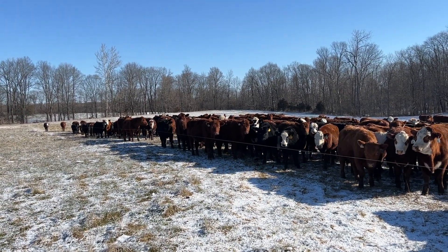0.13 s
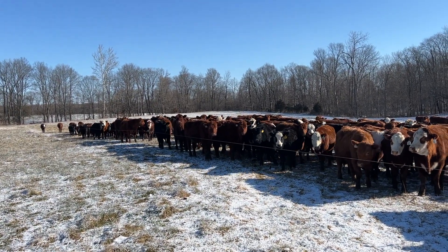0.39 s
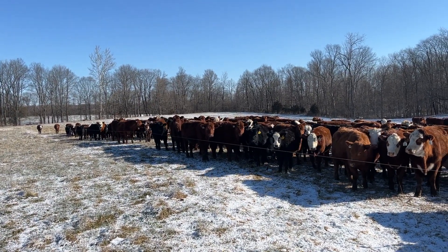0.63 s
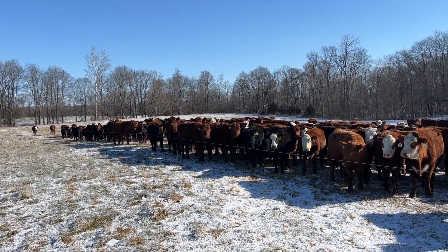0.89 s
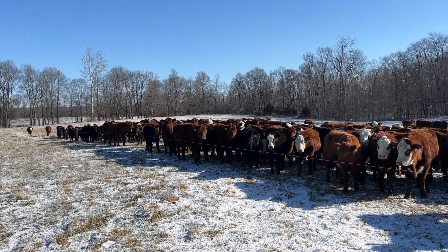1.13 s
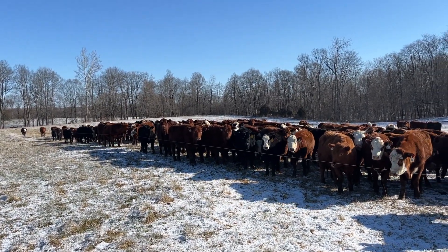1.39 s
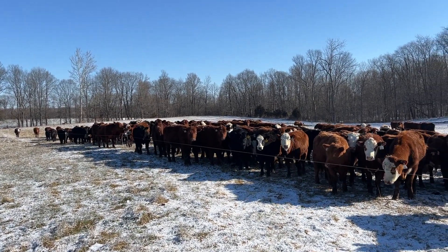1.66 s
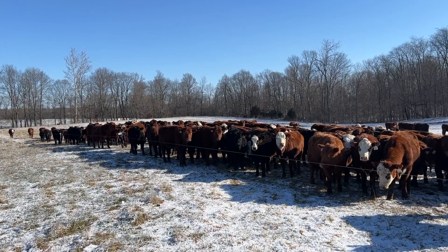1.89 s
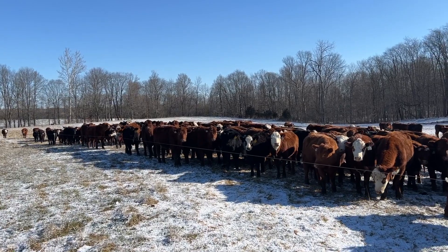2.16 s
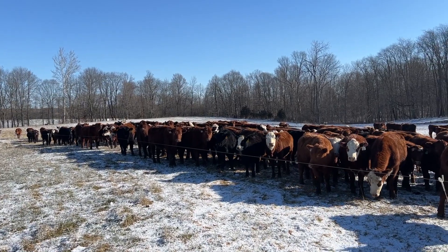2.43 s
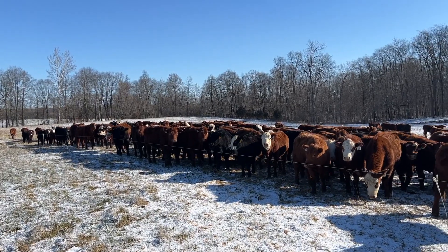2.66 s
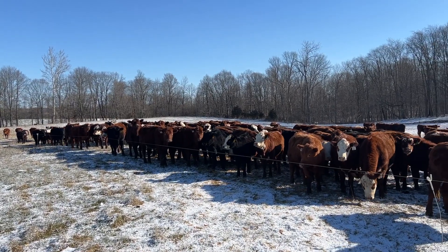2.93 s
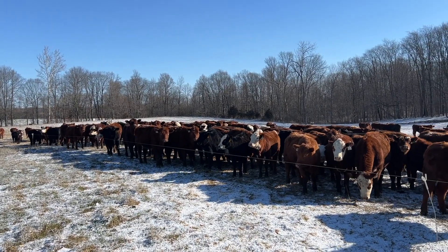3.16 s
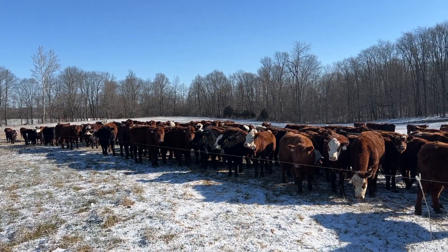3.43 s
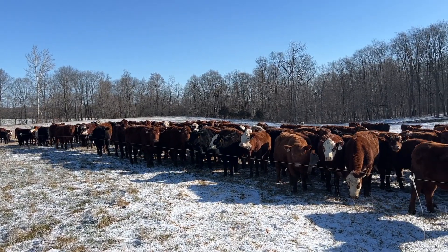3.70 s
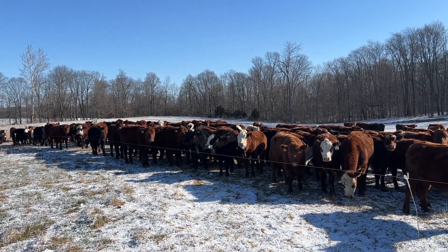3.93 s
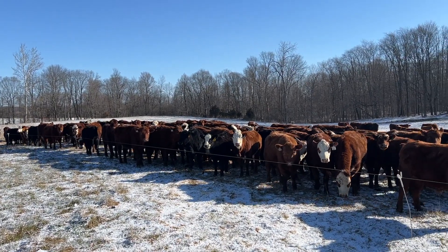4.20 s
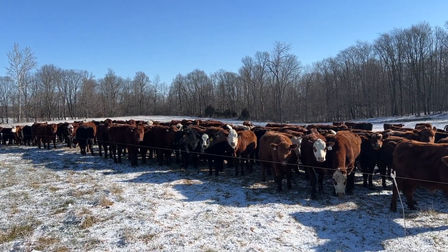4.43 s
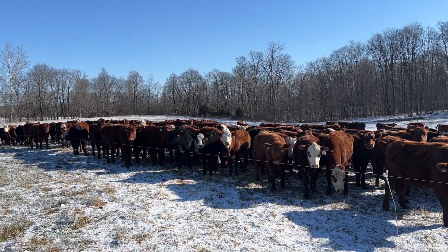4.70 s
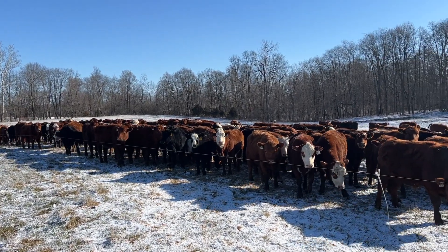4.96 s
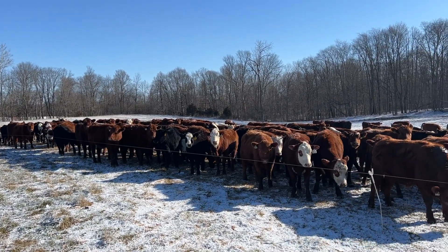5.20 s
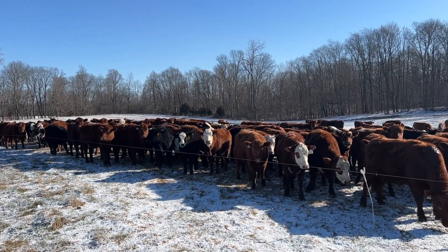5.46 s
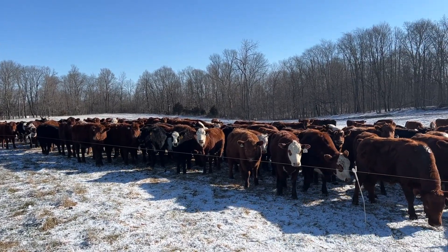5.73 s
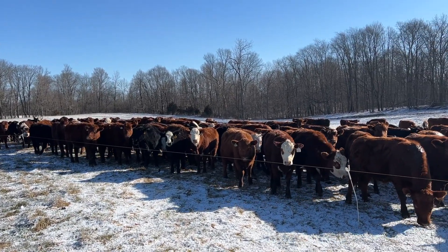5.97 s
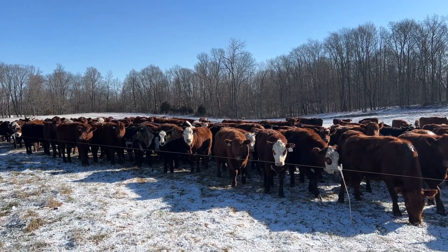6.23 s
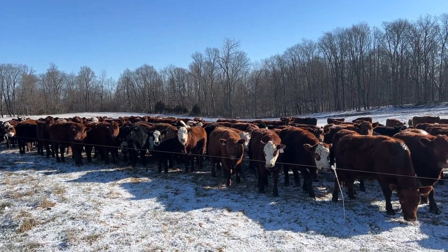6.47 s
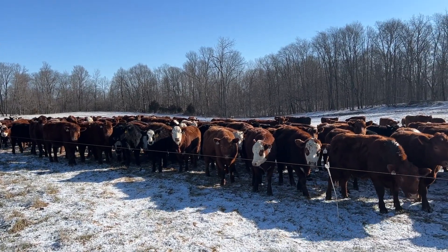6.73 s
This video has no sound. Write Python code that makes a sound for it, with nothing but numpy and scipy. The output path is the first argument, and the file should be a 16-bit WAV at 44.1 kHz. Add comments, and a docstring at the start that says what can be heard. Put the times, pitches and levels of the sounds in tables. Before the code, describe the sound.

Throughout, a small one-cylinder engine idles a little to the right, about ten or eleven soft low thumps a second, with thin metallic ticks and a fluctuating hiss; thump and hiss weaken after about 5.7 s. Low wind rumble comes in gusts at the start, 1.4, 2.1, 2.6, 3.2, 4.5 and 5.5 s, with sharp microphone slaps near 1.6, 2.7-3.05 and 5.7 s. A moo already sounding drops in pitch and stops by 0.3 s. From 0.9 s a cow hums low, opens its mouth around 1.4 s, climbs to a loud sustained moo, then sags and ends at 3.1 s. A shorter moo rises and falls from 3.4 to 4.0 s, followed by a faint breathy grunt until 4.35 s. Two quieter moos overlap between 4.6 and 5.8 s, the first leaning left. Soft wind flutters and the fading engine remain until nearly 7 s. Dry, open air, with barely any return from trees.

```python
"""Cattle in a windy pasture

Five cows moo in long glides, two of them at once, and one grunts faintly: harmonics and breath noise are shaped by
spectral envelopes. A small one-cylinder engine idles, louder on the right: swells, ringing ticks and filtered hiss.
Gusts buffet a phone's microphones: bands of noise that follow the wind level, with sudden slaps and soft flutters."""
import sys
import numpy as np
from scipy import signal
from scipy.fft import rfft, irfft
from scipy.io import wavfile
from scipy.ndimage import uniform_filter1d

SR = 44100
rng = np.random.default_rng(int(sys.argv[2]) if len(sys.argv) > 2 else 0)


def wav_record(signal):
    """Record a signal, one row per channel, as 16-bit PCM in the file named by sys.argv[1]."""
    frames = np.transpose(np.atleast_2d(signal))
    bounded = np.clip(frames, -1, 1)
    # unit amplitude maps onto the largest positive 16-bit level
    quanta = np.round(bounded * 32767).astype(np.int16)
    wavfile.write(sys.argv[1], SR, quanta)


def invert_db(level):
    """Linear amplitude ratio for a level in decibels (20 dB per decade), elementwise."""
    return 10 ** (np.asarray(level, dtype=float) / 20)


N = 302526  # length in samples

# Firings at which the idle changes pace, even steps between. Each row: time in seconds,
# exhaust thump in dB, change of the valve ticks in dB as the phone turns.
IDLE = [(-.022, -23.5, 1.5), (.738, -25.5, 0.5), (1.11, -23, -3.5), (1.876, -22.5, 3.5), (3.016, -23, -1),
        (3.766, -30, -2), (4.1613, -23.5, 2), (5.3241, -28, -3.5), (5.702, -25, 0.5), (6.0897, -34.5, -1.5),
        (6.865, -35, -7.5)]
ENGINE_LAG = -20  # samples by which the left port lags; negative, so the left leads
SIDES = np.array([[1], [-1]])  # opposite signs at the left and right ports


def band(x, hz, width):
    """Resonance: a two-pole filter with gain 1 at the centre and its bandwidth in Hz."""
    return signal.lfilter(*signal.iirpeak(hz, hz / width, fs=SR), x)


def colour(points, hz):
    """Spectral envelope: dB at hz from (Hz, dB) points, straight on a log-frequency axis."""
    f, db = np.transpose(points)
    return np.interp(np.log(hz), np.log(f), db)


def walk(rate, size=N):
    """Slow random modulation: levels held 1 / rate seconds, smoothed twice, with a spread near 1."""
    k = int(SR / rate)
    held = np.repeat(rng.standard_normal(size // k + 1), k)
    return 1.3 * uniform_filter1d(uniform_filter1d(held, k), k)[:size]


def place(x, pan_db, lag):
    """Stereo localisation: level (left minus right) and arrival time (left lag in samples) differ."""
    n = np.arange(len(x))
    left = invert_db(pan_db / 2) * np.interp(n - lag / 2, n, x)
    right = invert_db(-pan_db / 2) * np.interp(n + lag / 2, n, x)
    return np.array([left, right])


def gusts():
    """Gust envelope: wind level in dB, the strongest gust of the moment over the calm."""
    # Each row: start in seconds, hold in seconds, level at the start in dB, dying away in dB per second.
    gust_rows = [(0, 0.023, -31.5, 25), (1.446, 0.13, -28.5, 49), (2.059, 0.08, -33.5, 47),
                 (2.64, 0.47, -28.5, 251), (3.243, 0.14, -32.5, 110), (4.481, 0.204, -36.5, 128),
                 (5.51, 0.4, -27, 472), (6.015, 0.12, -43, 5)]
    calm_db, rise_db_s, build_db_s = -43.5, 128, 7  # between gusts; front; slow growth while it holds
    t = np.arange(N) / SR
    level_db = np.full(N, calm_db)
    for start, hold, db, fall in gust_rows:
        front = rise_db_s * np.minimum(t - start, 0)
        growth = build_db_s * np.clip(t - start, 0, hold)
        decay = fall * np.maximum(t - start - hold, 0)
        level_db = np.maximum(level_db, db + front + growth - decay)
    return level_db


def wind_slaps(out):
    """Transient pressure: adds sudden slaps, each a short damped swing of the diaphragm."""
    # Each row: time in seconds (the middle comes 3 ms later), level in dB.
    slap_rows = [(1.582, -20.5), (2.677, -25.5), (2.847, -24.5), (2.985, -17.5), (3.053, -17.5),
                 (4.523, -29.5), (5.7, -17), (5.872, -26.5), (5.978, -35.5), (6.129, -32.5), (6.225, -34.5),
                 (6.635, -38.5), (6.852, -40)]
    t = np.arange(-600, 1200) / SR
    # one quick swing of the diaphragm riding on a slower one
    quick = np.exp(-(t / 0.001) ** 2) * np.sin(2 * np.pi * 400 * t)
    slow = 1.36 * np.exp(-(t / 0.0023) ** 2) * np.sin(2 * np.pi * 170 * t)
    for (at, db), lean in zip(slap_rows, rng.standard_normal(len(slap_rows))):
        i = int(at * SR) - 470
        out[:, i:i + len(t)] += place(invert_db(db) * (quick + slow), 3 * lean, 8 * lean)[:, :N - i]
    return out


def wind_flutters(tears):
    """Amplitude-modulated turbulence: soft puffs of dull noise as air flutters across the ports."""
    # Each row: middle in seconds, half length in seconds (fall to 1/e), level in dB before filtering.
    flutter_rows = [(4.762, .012, -27), (5.659, 0.021, -16), (5.794, 0.064, -18), (6.021, 0.013, -21.5),
                    (6.096, 0.031, -24), (6.378, 0.036, -25), (6.518, 0.039, -30), (6.784, 0.015, -32.5)]
    t = np.arange(N) / SR
    puffs = sum(invert_db(db) * np.exp(-((t - at) / half) ** 2) for at, half, db in flutter_rows)
    dull = signal.butter(4, [140, 480], "band", fs=SR, output="sos")
    return place(signal.sosfilt(dull, puffs * invert_db(5 * tears) * rng.standard_normal(N)), 2, -4)


def wind():
    """Turbulence in lumps: a deep rumble, harsher layers that grow faster with the gust, a thin rustle."""
    level_db = gusts()
    lumps, tears = np.tanh(walk(22)), np.tanh(walk(50))
    harsh_db = 0.14 * (level_db + 38) - 3.5 + 4 * lumps
    rip_db = 0.25 * (level_db + 30) - 16 + 7.8 * lumps + 6.5 * tears
    rustle_db = 0.12 * (level_db + 25) - 50.5 + 5.3 * tears
    ports = []
    for share_db in (0, -15):  # common part, then the part of opposite sign at the two ports
        noise = rng.standard_normal(N)
        deep, harsh, rip = (signal.sosfilt(signal.butter(3, edges_hz, "band", fs=SR, output="sos"), noise)
                            for edges_hz in ([38, 87], [90, 183], [190, 338]))
        rustle = band(band(noise, 4850, 1000), 4850, 1000)
        layers = invert_db(0.65 * lumps) * deep / np.std(deep)
        layers = layers + invert_db(harsh_db) * harsh / np.std(harsh)
        layers = layers + invert_db(rip_db) * rip / np.std(rip)
        layers = layers + invert_db(rustle_db) * rustle / np.std(rustle)
        ports.append(invert_db(level_db + share_db) * layers)
    # eddies lean on one port, then on the other
    out = ports[0] * invert_db(3.8 * walk(16) * SIDES) + ports[1] * SIDES
    return wind_slaps(out) + wind_flutters(tears)


def whir():
    """Broadband noise: overlapping bands of hiss swell together and flicker alone, with a singing engine cover;
    most comes from the engine's side, the rest from all round."""
    # Engine fan and open air. Each row: frequency in Hz, relative spectral density in dB per Hz.
    whir_tone = [(400, -8), (700, -2.5), (1050, 1), (1500, -13), (2200, -5.5), (3200, -11.5), (4030, -36),
                 (5080, -17), (8060, -19.5), (10160, -62.5), (12800, -24)]
    near, around, swell = 0, 0, walk(7.9)
    for hz in 400 * 2 ** np.arange(0, 5.3, 1 / 3):  # third-octave spacing
        gain = invert_db(colour(whir_tone, hz) + 0.56 * swell + 3.6 * walk(17))
        near = near + gain * band(band(rng.standard_normal(N), hz, hz / 2), hz, hz / 2)
        around = around + gain * band(band(rng.standard_normal(N), hz, hz / 2), hz, hz / 2)
    near = near + 0.64 * band(near, 2180, 140)  # the singing cover
    out = place(near, -6, ENGINE_LAG) + 0.5 * around * SIDES
    # the hiss fades with the thump when the phone turns away
    s, thump_db, _ = np.transpose(IDLE)
    near_db = 0.39 * np.interp(np.arange(N) / SR, s, thump_db)
    return out * invert_db(-59 + near_db - near_db.mean()) / np.std(out)


def engine():
    """Impulse response: each firing sends a slow swell down the exhaust pipe and rings three valve-gear ticks."""
    # Valve gear after each firing. Each row: delay in seconds, level in dB before the turn of the phone.
    tick_rows = [(0, -48.5), (.0115, -53), (.0215, -54.5)]
    # Resonances of the ticks. Each row: centre in Hz, width in Hz, gain in dB.
    ring_rows = [(2340, 596, 18.5), (4300, 580, -11), (7906, 355, 17), (13800, 480, 3)]
    idle_hz = 10.5  # nominal firings a second, which sets the count between rows of the idle
    s, thump_db, tick_db = np.transpose(IDLE)
    number = np.r_[0, np.cumsum(np.round(np.diff(s) * idle_hz))]
    k = np.arange(number[-1])
    chance = rng.standard_normal((len(k), 5))  # timing, thump level, three tick levels
    at = (np.interp(k, number, s) + 0.0012 * chance[:, 0])[1:]
    chance = chance[1:]  # the first firing falls before the start
    fire, ticks = np.zeros(N + SR), np.zeros(N + SR)
    fire[(at * SR).astype(int)] = invert_db(np.interp(at, s, thump_db) + 2.32 * chance[:, 1])
    near_db = np.interp(at, s, tick_db)
    for j, (delay, db) in enumerate(tick_rows):
        ticks[((at + delay) * SR).astype(int)] = invert_db(db + near_db + 4 * chance[:, 2 + j])
    t = np.arange(SR // 8) / SR
    swell = (t / 0.018) ** 4 * np.exp(4 - 4 * t / 0.019) * np.cos(2 * np.pi * 97 * (t - 0.0203))
    knock = invert_db(-13.5) * (t / 0.006) * np.exp(1 - t / 0.0053) * np.cos(2 * np.pi * 250 * (t - 0.0036))
    thump = signal.fftconvolve(fire, swell + knock)[:N]
    burst = signal.fftconvolve(ticks, np.exp(-t / 0.0028) - np.exp(-t / 0.0013))[:N]
    near, around = (sum(invert_db(db) * band(burst * rng.standard_normal(N), hz, width) for hz, width, db in ring_rows)
                    for _ in range(2))
    return place(thump, -3.2, ENGINE_LAG) + place(near, -1.2, ENGINE_LAG) + 0.4 * around * SIDES


def breath(t, hz, top_db, octave_db, push_db, release):
    """Vocal intensity: level follows pitch and the push of the lungs, and drops 16 dB over the release."""
    pitch_db = octave_db * np.log2(hz / hz.max())
    lung_db = push_db * (t - t[hz.argmax()])
    return top_db + pitch_db + lung_db - 16 * np.clip(1 - (t[-1] - t) / release, 0, 1)


def mouth(t, hz, opens, hum_db, drift_db, chest_db):
    """Radiation from the lips: closure 0-1, hum level, treble dB per octave, and chest tone past the top pitch."""
    effort_db = 40  # treble per octave is this much duller for each octave that the pitch has still to climb
    closed = np.clip(1 - (t - opens) / 0.043, 0, 1)  # 43 ms to open
    under, sagging = np.log2(hz / hz.max()), t > t[hz.argmax()]
    treble_db = drift_db * (t - (opens + t[-1]) / 2) + effort_db * under * ~sagging
    return closed, hum_db * closed, treble_db, chest_db * under * sagging


def moo(voice, envelope, hoarse, lungs, lips):
    """Source and filter: vocal-fold harmonics take a spectral envelope; hoarseness shakes the pitch and adds air."""
    reach, reach_hz = 0.22, 1350  # in the climb, resonances above reach_hz rise with pitch to the power reach
    nose_hz, nose_db = 860, -28  # the closed-lip hum changes by this per octave above the nose resonance
    nose_flat = 0.7  # share of the envelope's colour that closed lips take away
    treble_hz, blur_hz = 1950, 2470  # the mouth changes the colour above; scale on which overtones blur
    s, hz = np.transpose(voice)
    n = np.arange(int(s[0] * SR), min(int(s[-1] * SR), N))
    t = n / SR
    hz = uniform_filter1d(np.interp(t, s, hz), size=1600, mode="nearest")
    closed, hum_db, treble_db, chest_db = mouth(t, hz, *lips)
    level_db = breath(t, hz, *lungs) + hum_db
    stretch = np.where(n < n[hz.argmax()], hz.max() / hz, 1) ** reach
    shake = 0.003 * walk(24.61, size=len(n)) + 0.3 * hoarse ** 2 * walk(180, size=len(n))
    phase = 2 * np.pi * np.cumsum(hz * (1 + shake)) / SR
    tone, power, top_hz = 0, 0, envelope[-1][0]
    for k in range(1, int(top_hz / hz.mean()) + 1):
        overtone = k * hz
        envelope_db = colour(envelope, overtone * np.clip(overtone / reach_hz, 1, stretch))
        nose_octaves = np.maximum(np.log2(overtone / nose_hz), 0)
        treble_octaves = np.maximum(np.log2(overtone / treble_hz), 0)
        gain = invert_db((1 - nose_flat * closed) * envelope_db) / (1 + (overtone / 3300) ** 4)
        gain = gain * invert_db(nose_db * closed * nose_octaves + treble_db * treble_octaves + chest_db * (k == 1))
        power = power + (overtone > 450) * gain ** 2 / 2
        # high overtones lose their order
        blur = np.minimum((overtone / blur_hz) ** 3, 3) * walk(70, size=len(n))
        wave = np.cos(k * phase + 0.3 * k * k + 0.8 * blur)
        tone = tone + gain * invert_db(1.8 * walk(14, size=len(n))) * wave
    # a call that begins at 0 s is already sounding, so it has no fade in
    fade = np.clip(np.minimum(t - s[0] + (s[0] <= 0), s[-1] - t) / 0.033, 0, 1)
    # air rushing past the folds takes the same envelope
    bins = np.arange(1, len(n) // 2 + 2) * SR / len(n)
    air_gain = invert_db(colour(envelope, bins)) * (bins > 300) * (bins < top_hz)
    air = irfft(rfft(rng.standard_normal(len(n))) * air_gain, len(n))
    voiced = tone / np.sqrt(uniform_filter1d(power, size=2000))  # levelled by the overtones above 450 Hz
    out = np.zeros(N)
    out[n] = fade * invert_db(level_db) * ((1 - hoarse) * voiced + hoarse * air / np.std(air))
    return out


def cattle():
    """Superposition: the calls of the herd, each from its place, and a faint diffuse return from the tree line."""
    # Pitch of each call: most rise and then sag, the first only falls, the grunt stays level.
    # Each row: time in seconds, pitch in Hz.
    COW_A = [(0, 189.9), (.15, 183.8), (.232, 168.6), (.27, 142.4), (.33, 135.3)]
    COW_B = [(.92, 82.8), (1.2, 99.86), (1.45, 138.5), (1.75, 184.3), (1.94, 194.4), (2.4, 203.1),
             (2.55, 199.3), (2.63, 181.5), (2.85, 173), (3.08, 134.3)]
    COW_C = [(3.38, 132.8), (3.57, 171.7), (3.7, 192.9), (3.78, 199.6), (3.85, 196.2), (3.91, 184.3),
             (3.985, 148)]
    COW_D = [(4.62, 100.1), (4.72, 109.8), (5.016, 120.8), (5.132, 128.5), (5.352, 134.9), (5.59, 123.6)]
    COW_E = [(4.82, 167.4), (5.216, 177.6), (5.45, 173.4), (5.6, 154.6), (5.77, 124.3)]
    GRUNT = [(4.03, 76.9), (4.36, 76.9)]
    # Spectral envelope of each call; the first also has a thin haze up to 13 kHz.
    # Each row: frequency in Hz, relative level in dB.
    THROAT_A = [(190, 5), (300, 9.5), (380, -7), (560, -24.5), (750, -8), (940, -8.5), (1320, -5.5),
                (1900, -3.5), (2600, -13.5), (3700, -26), (4500, -18), (13000, -7.5)]
    THROAT_B = [(200, 8), (400, -18), (600, 1.5), (800, -20), (900, -0.5), (1010, -11), (1180, -7),
                (1370, -26.5), (1650, -13.5), (1830, -6.5), (2080, -25), (2300, -12), (2540, -32),
                (2800, -23.5), (3300, -33)]
    THROAT_C = [(200, -6), (390, -22), (580, 0), (750, -10), (960, -22), (1160, -11), (1600, -23),
                (1930, -16), (2500, -28), (2950, -52)]
    THROAT_D = [(250, 7), (620, -15.5), (780, -6.5), (900, -11), (1060, 3), (1190, -10.5), (1440, -5),
                (1700, -21), (3000, -16)]
    THROAT_E = [(170, 16.5), (350, 4.5), (520, -6.5), (700, 2), (880, -9), (1400, -4.5), (1650, -17.5),
                (2290, -4), (2500, -14)]
    THROAT_GRUNT = [(400, -1), (850, 5), (1600, -13)]
    # The herd. Each row: pitch, spectral envelope, hoarseness 0-1, left minus right in dB, left lag in samples.
    herd_rows = [(COW_A, THROAT_A, 0.11, 2, -2.2), (COW_B, THROAT_B, 0.11, 0.46, 0.89),
                 (COW_C, THROAT_C, 0.11, -0.99, 1), (COW_D, THROAT_D, 0.14, 5.2, -6.5),
                 (COW_E, THROAT_E, 0.023, 1.5, -1.5), (GRUNT, THROAT_GRUNT, 0.93, -0.55, 0)]
    # Breath in herd order. Each row: level in dB at the top pitch, loss in dB per octave under it,
    # push in dB per second, release in seconds.
    breath_rows = [(-37.5, 10.5, 16.5, 0.066), (-34.5, 21.5, -1, 0.057), (-36, 31.5, 16, 0.058),
                   (-48.5, 18, 1.5, .036), (-54, 12, 1.5, .047), (-52.5, -2, 6, 0.27)]
    # Mouth in herd order. Each row: opening time in seconds, hum in dB behind closed lips, treble drift
    # in dB per octave per second, chest tone lost in dB per octave as the pitch sags.
    mouth_rows = [(-.1, 5, 5, 35), (1.407, -8.5, -15.5, 44), (3.522, -10, -3, -23), (4.669, -5.5, -3, -6),
                  (4.84, -11, 49, 0), (3.95, 0, -10, 3)]
    herd = sum(place(moo(voice, envelope, hoarse, lungs, lips), pan_db, lag)
               for (voice, envelope, hoarse, pan_db, lag), lungs, lips in zip(herd_rows, breath_rows, mouth_rows))
    t = np.arange(SR // 2) / SR
    decay = np.exp(-np.log(1000) * t / 0.17)  # 60 dB in 0.17 s
    trees = rng.standard_normal((2, len(t))) * decay * (t > 0.02)
    echo = signal.fftconvolve(herd.mean(axis=0)[None], trees, axes=1)[:, :N]
    return herd + invert_db(-32) * echo


def scene():
    """Linear mixture of wind, engine and herd at the two ports."""
    return wind() + whir() + engine() + cattle()


def band_limit(x):
    """A steep low-pass at the top of the band."""
    return signal.sosfilt(signal.butter(12, 15830, fs=SR, output="sos"), x)


def record(dry):
    """Linear filtering: cuts the deepest bass; the highest treble sits near the middle."""
    side = (dry[0] - dry[1]) / 2
    top = side - signal.sosfiltfilt(signal.butter(6, 10300, fs=SR, output="sos"), side)
    centred = dry - 0.75 * top * SIDES
    mix = signal.sosfilt(signal.butter(2, 36, "high", fs=SR, output="sos"), centred)
    return band_limit(mix)


dry = scene()
out = record(dry)
wav_record(out)
```